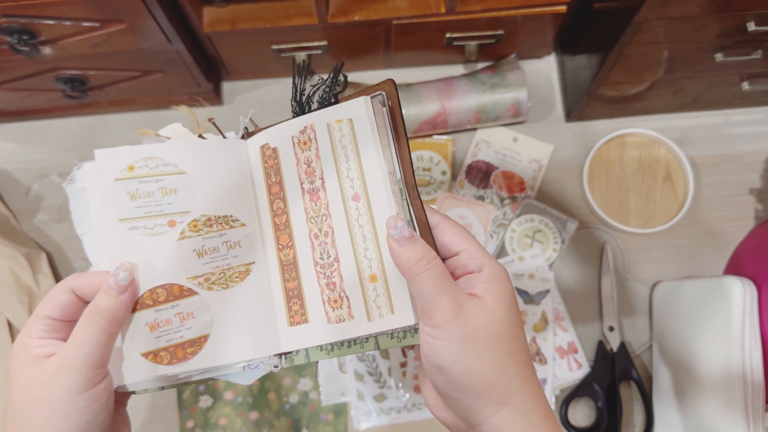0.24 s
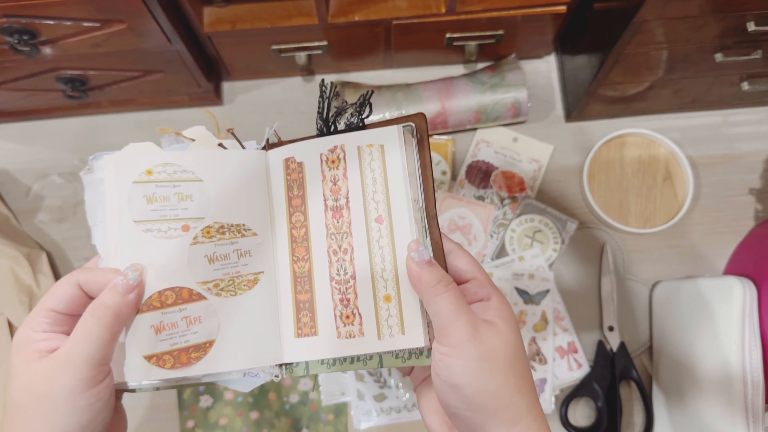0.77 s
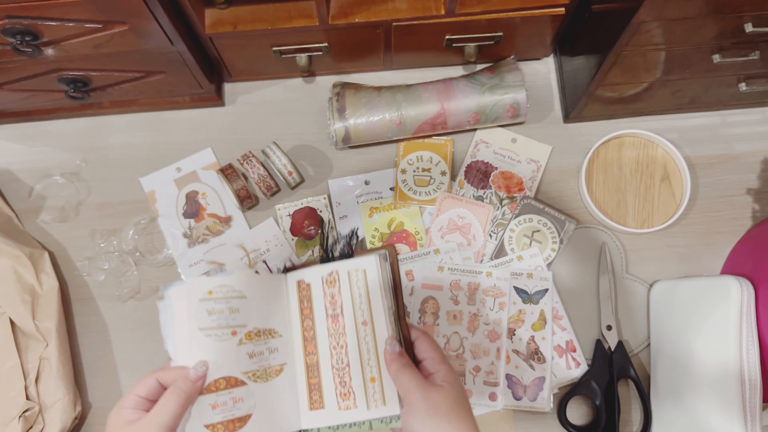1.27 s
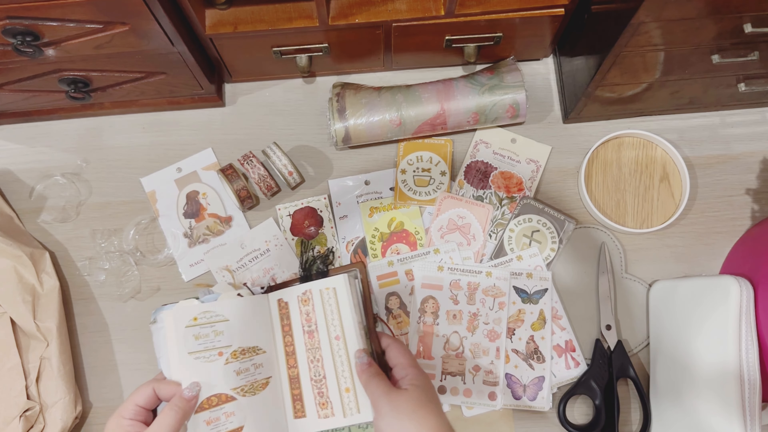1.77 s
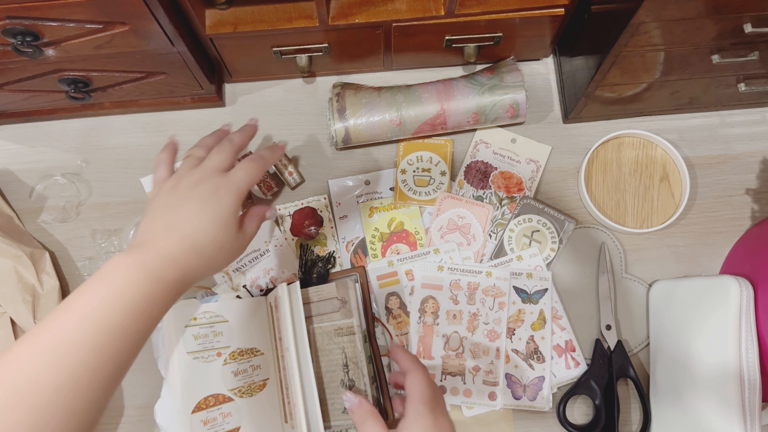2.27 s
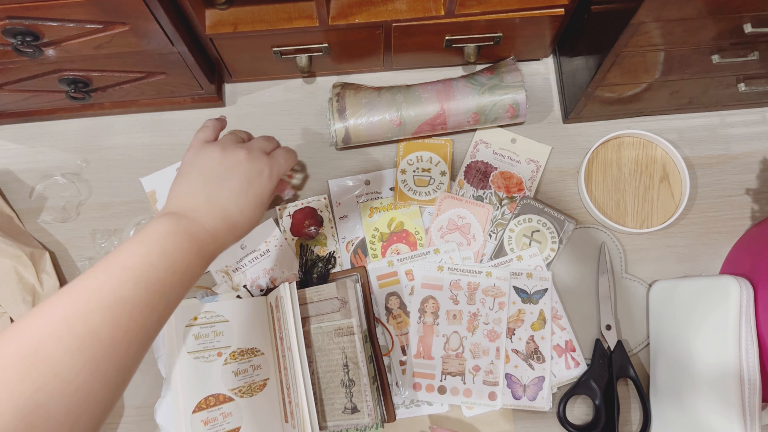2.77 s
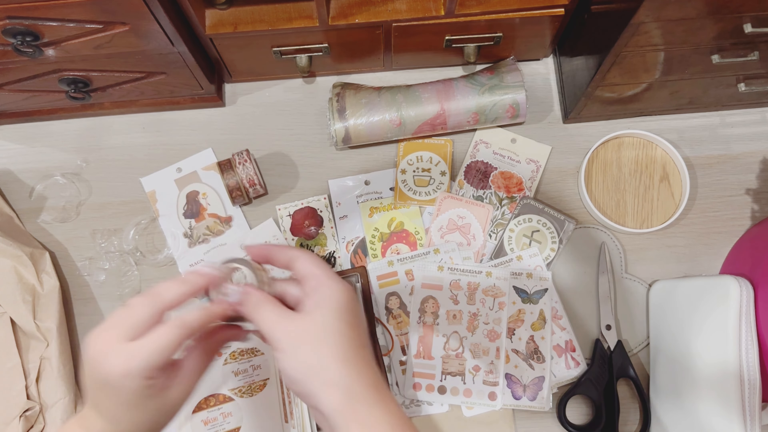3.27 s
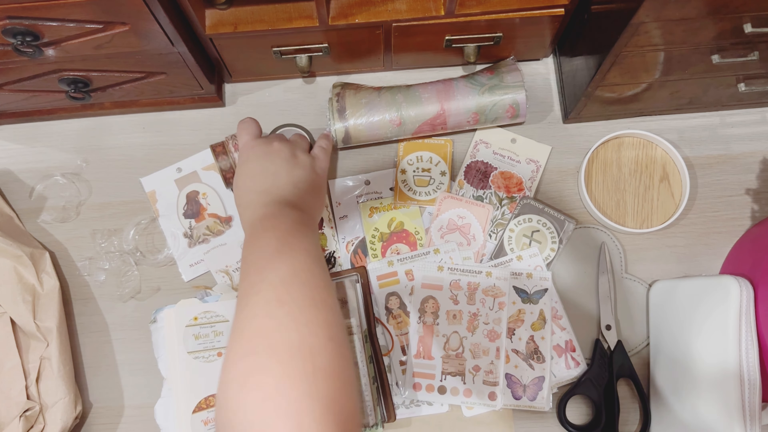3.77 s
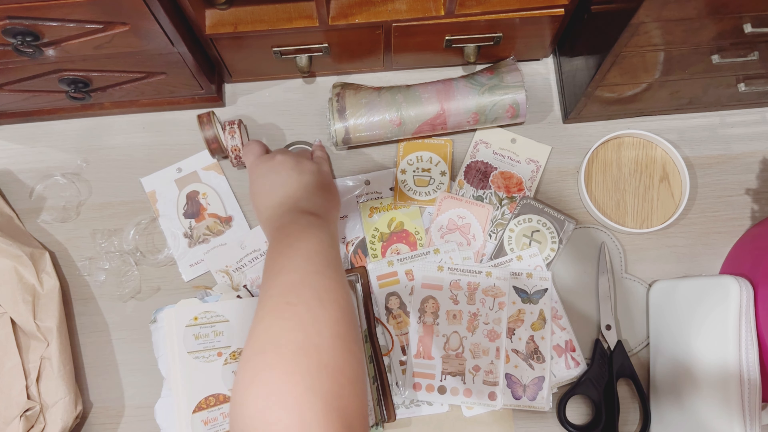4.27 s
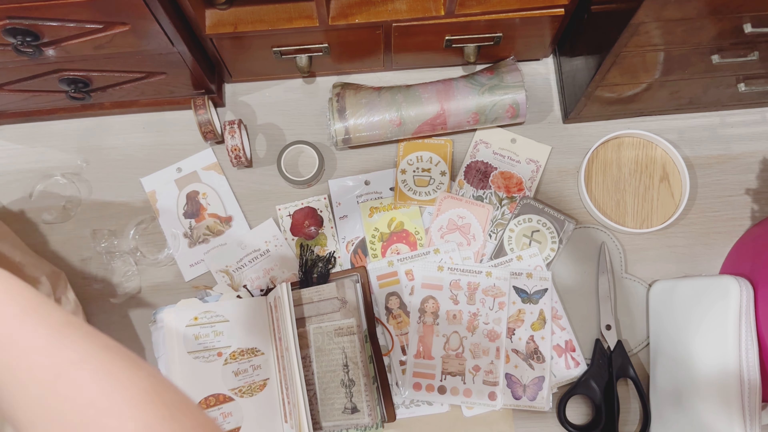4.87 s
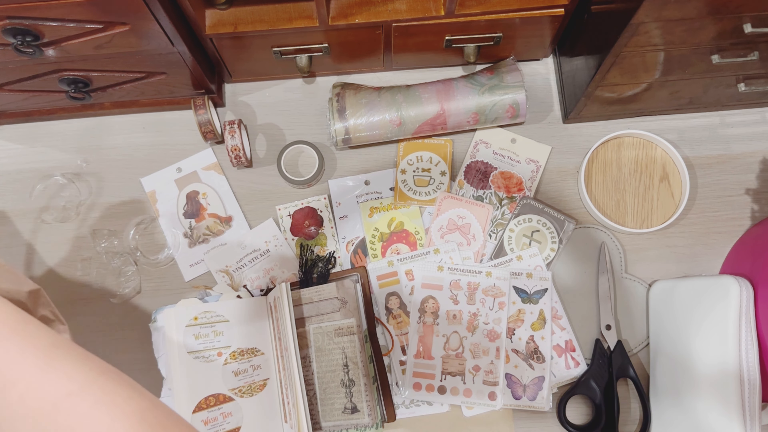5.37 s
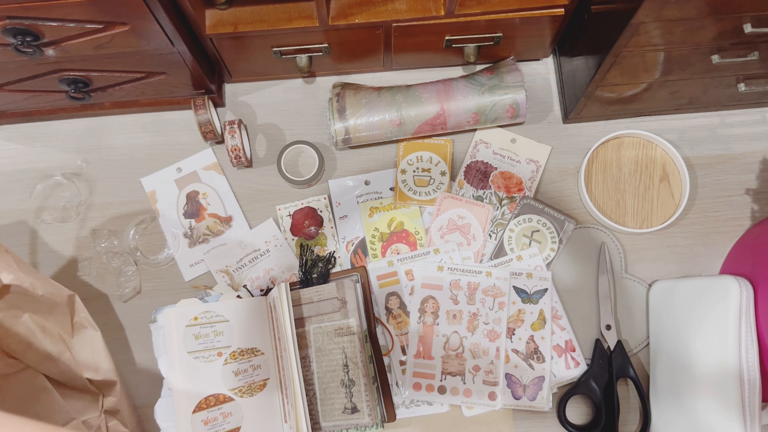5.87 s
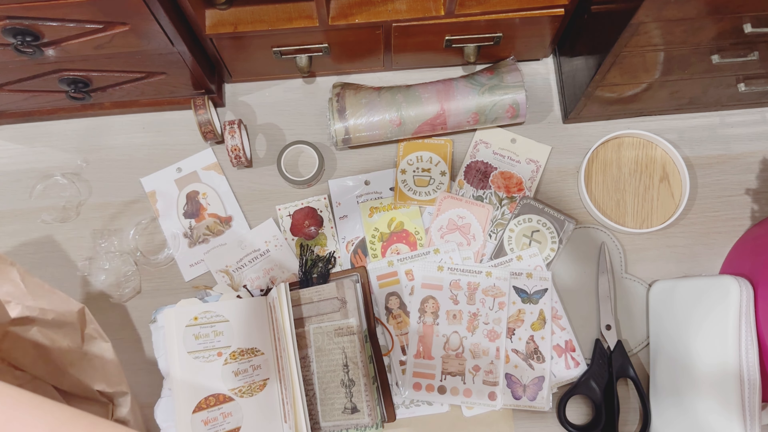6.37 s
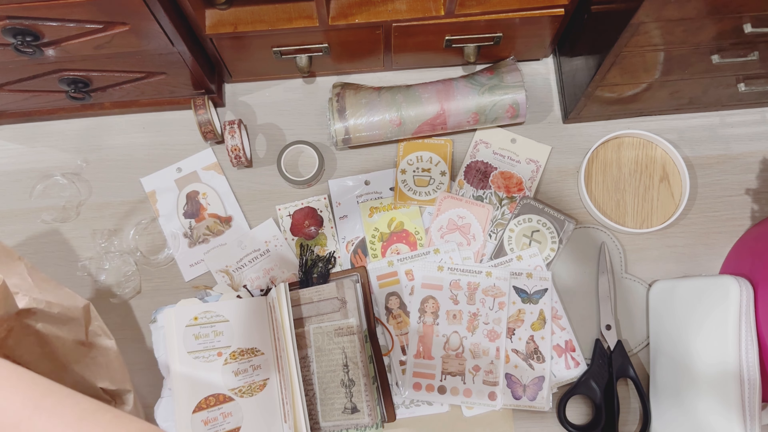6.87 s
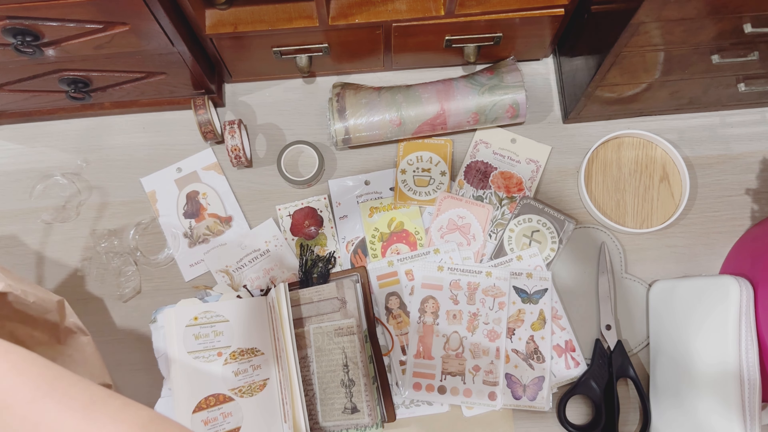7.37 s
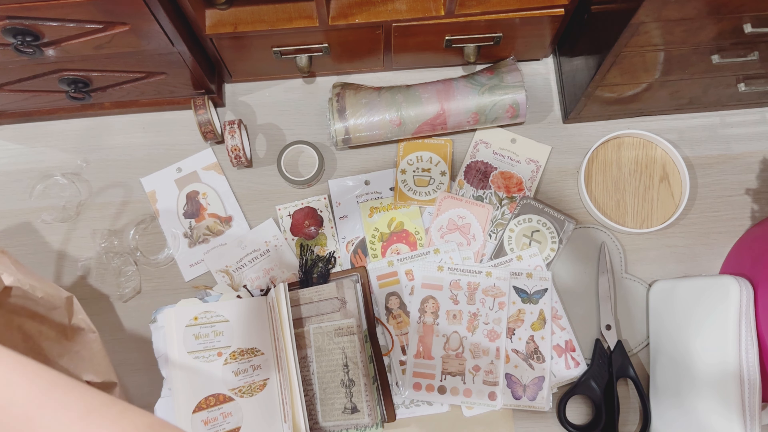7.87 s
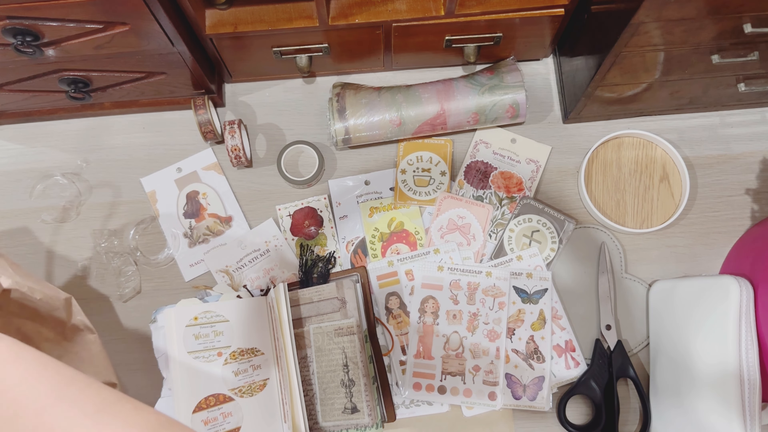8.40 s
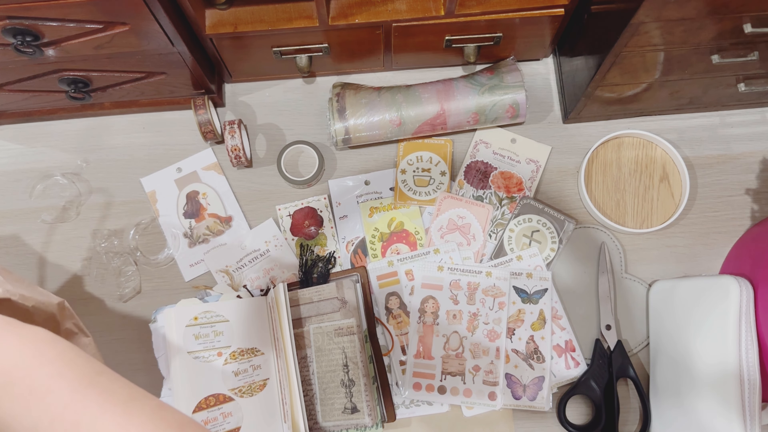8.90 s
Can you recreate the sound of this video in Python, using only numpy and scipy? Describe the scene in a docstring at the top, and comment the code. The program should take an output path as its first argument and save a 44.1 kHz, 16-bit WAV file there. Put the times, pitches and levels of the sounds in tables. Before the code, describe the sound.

Close stereo pickup of hands at a wooden table in a small, quiet room. Light page snaps and a brief high metallic jingle come first, then soft bumps from a notebook and faint taps of tape rolls. A hard cluster of knocks stands out far above everything, settling in a quick rattle. Afterward a paper bag crackles and rustles irregularly, with brushing swishes near the end, over a steady low hum.

```python
"""Paper snaps and rustle open over a low hum and faint hiss, joined at once by a small metal charm.
Hands lay down a notebook, set tape rolls on a wooden table and rummage in a paper bag, in a quiet room.
Knocks and snaps are dying noise bursts, with ringing table modes under the knocks; the charm is sines.
Rustle is patchy noise driven by strokes; hum and hiss are shaped noise with slowly wandering levels."""
import sys
import numpy as np
from scipy import signal
from scipy.fft import rfft, irfft, next_fast_len
from scipy.io import wavfile
from scipy.ndimage import uniform_filter1d

SR = 44100
rng = np.random.default_rng(int(sys.argv[2]) if len(sys.argv) > 2 else 0)


def store_pcm(level_fs):
    """Save levels as 16-bit WAV."""
    pcm = np.round(np.clip(level_fs, -1, 1) * 32767).astype(np.int16)
    wavfile.write(sys.argv[1], SR, np.atleast_2d(pcm).T)


N = 403074  # samples

# Tape rolls and notebook on the table: start_s, lower_ring_peak_db, lower_ring_hz, upper_ring_db,
# treble_db, table_top_db, deep_thud_db, hardness_db_per_octave
KNOCKS = [(1.513, -57, 1210, -64, -72, -56, -34, -4), (1.826, -47, 1030, -40, -58, -48.5, -33.5, 1.5),
          (2.546, -37, 1740, -41, -56, -35.5, -54, -4), (2.5676, -39, 1020, -48, -73, -36, -39, -4),
          (2.8, -42, 1210, -53, -79, -33.5, -52, -4), (2.8218, -58, 1450, -66, -77, -41, -52, -12),
          (3.96, -43.5, 1150, -68.5, -67, -40.5, -55, 0), (4.2037, -15.5, 1130, -35, -55, -27, -37, 6.5),
          (4.226, -17, 785, -21.5, -30, -40, -28.5, 4), (4.229, -9, 1180, -15.5, -23, -30, -45, 2),
          (4.235, -18.5, 1040, -43, -49, -38, -28.5, 1.5), (4.267, -22.5, 1090, -51, -59, -28, -41, 1.5),
          (4.284, -25.5, 800, -50, -61, -30, -46, 4), (4.49, -41, 830, -49, -57, -37.5, -54, 3),
          (4.51, -50, 810, -54, -59, -40, -58, -3)]
# Table top modes: pitch_hz, level_db, t60_s
TABLE_TOP = [(215, -6, 0.068), (280.7, -2.5, 0.16), (342, -9.5, 0.11), (419, -12.5, 0.084),
             (518, -7, 0.041), (704, -13.5, 0.027)]
# Table legs and floor modes: pitch_hz, level_db, t60_s
THUD = [(68, 0, 0.14), (113, -2, 0.11)]
KNOCK_UPPER_HZ, KNOCK_T60_S, KNOCK_ROOM_DB, KNOCK_PAN_DB = 2564, 0.02, -9.5, -0.5
KNOCK_BODY_DB, KNOCK_BODY_T60_S = -8., 0.14  # dull wooden body, against table top plus hardness

# The dropped rolls settle: start_s, level_db, t60_s
RATTLE = (4.235, -40, 0.5)
# Colour of the settling rolls: frequency_hz, level_db
ROLLS = [(400, -6), (1000, 2), (1600, -2), (2500, -2), (3500, -2), (4500, -21), (16000, -39)]
TICKS_PER_S = 400

# Paper and plastic snaps: start_s, lower_ring_peak_db, lower_ring_hz, upper_ring_hz, upper_ring_db,
# treble_db, hollow_puff_db
SNAPS = [(.062, -38.5, 1210, 3070, -61, -40, -50), (.084, -44, 1410, 2820, -47, -48, -63),
         (0.58, -48, 1600, 3530, -39.5, -50, -67), (1.114, -38, 1500, 2660, -51, -48, -69),
         (1.121, -39, 1390, 2630, -43, -44, -72), (1.169, -38.5, 1590, 2000, -55, -44, -61),
         (1.174, -42, 1100, 2620, -45, -37.5, -63), (1.194, -42, 1560, 2700, -59, -45, -56),
         (1.488, -45, 1050, 2310, -40, -66, -69), (1.494, -48, 641, 3480, -62, -56, -53),
         (1.653, -50, 1140, 2330, -55, -73, -71), (1.817, -43, 996, 2300, -56, -64, -61.5),
         (4.416, -32, 1350, 2600, -47, -58.5, -59), (4.452, -34, 1530, 3970, -32.5, -55, -45),
         (4.458, -29.5, 650, 2350, -36, -53, -52), (4.463, -33, 1320, 4100, -35, -35.5, -59),
         (4.474, -32, 1160, 2560, -31, -38, -37), (4.604, -36.5, 1090, 2820, -57, -75, -40),
         (4.655, -39, 740, 2010, -47, -70, -49), (4.881, -47.5, 810, 4100, -54, -71, -51),
         (4.909, -32, 1260, 2360, -42, -60, -46), (4.923, -37, 670, 2800, -33, -40, -56),
         (4.956, -30.5, 660, 3430, -24, -35, -45), (4.997, -49, 651, 2340, -59, -61, -39.5),
         (5.049, -43.5, 886, 3000, -59, -55, -42.5), (5.084, -40, 830, 2750, -61, -62, -50),
         (5.45, -42, 720, 2760, -65, -62, -50), (5.484, -38.5, 584, 3500, -69, -64, -40.5),
         (5.61, -40, 1040, 2540, -39.5, -60, -46.5), (5.935, -57, 1230, 2690, -50, -51, -56),
         (5.957, -46.5, 1330, 3780, -47, -46, -44.5), (5.985, -55, 900, 2600, -47, -68, -58),
         (6.04, -47, 799, 3580, -69, -67, -55), (6.168, -40.5, 1070, 2580, -35, -61, -60),
         (6.329, -43.5, 1000, 2430, -59, -72, -66), (6.559, -33, 754, 2710, -33.5, -40, -44),
         (6.629, -40.5, 710, 2620, -39.5, -46, -63), (6.93, -38, 1350, 2600, -44, -70, -48),
         (6.934, -30.5, 668, 2520, -52, -72, -49), (7.076, -38.5, 774, 2700, -41, -62, -64),
         (7.215, -40.5, 1160, 2460, -53, -63, -51), (7.252, -36.5, 1200, 2770, -29, -61, -47),
         (7.427, -34.5, 820, 2530, -32.5, -28.5, -42), (7.646, -44, 641, 2290, -55, -56, -52),
         (8.472, -62, 1240, 2730, -57, -43, -66), (8.807, -46, 985, 2800, -40.5, -39, -49),
         (8.903, -56, 1040, 2680, -41.5, -64, -62), (9.123, -33.5, 1200, 2470, -34.5, -63, -40)]
SNAP_T60_S, SNAP_ROOM_DB, SNAP_PAN_DB = 0.023, -10, -2.5

# Strokes of paper and sleeve: start_s, hold_s, treble_level_db, middle_lift_db
STROKES = [(0.075, .01, -63, -0.5), (1.16, .1, -68, -5), (1.495, .01, -73, -1), (1.86, .02, -60.5, -3.5),
           (4.344, 0.048, -63, 4.5), (4.476, 0.011, -54.5, -1.5), (4.683, .01, -68, 1),
           (4.948, 0.039, -61, 0), (5.04, .01, -56, -4), (5.214, .005, -53.5, -4), (5.316, 0.12, -61, 0),
           (5.46, 0.061, -59, -1), (5.588, .005, -63, 2), (6.076, .005, -64, -2), (6.184, .01, -64, 2.5),
           (6.565, .01, -61.5, -4), (6.926, .02, -69, 4), (7.22, 0.044, -68, -9), (7.353, .005, -52.5, -8),
           (7.427, .005, -61, -2), (7.548, .03, -68, -13), (8.197, .01, -54.5, -11.5),
           (8.343, 0.027, -53, -11.5), (8.498, 0.071, -53.5, -9.5), (8.61, .05, -58, -7),
           (8.768, 0.042, -51, -6.5), (9.07, .005, -59, -6)]
RISE_DB_PER_S, FALL_DB_PER_S = 258, 153
STROKE_BODY_DB = -1.2  # on top of the middle lift
# Faint shifting of paper and sleeve between the strokes: time_s, treble_level_db
SHIFTING = [(0, -72.5), (.4, -76), (.65, -76.5), (.95, -73), (1.4, -72.5), (1.8, -77), (2.0, -73),
            (2.56, -76.5), (3.17, -74.5), (4.18, -77), (4.3, -68.5), (4.8, -72.5), (5.7, -74.5), (6.0, -71),
            (6.7, -74.5), (7.1, -73.5), (7.8, -72.5), (9.14, -70.5)]
SHIFTING_MIDDLE_DB, SHIFTING_BODY_DB = 3.5, 6.5  # lifts over the treble level
# Colour of rubbed paper: frequency_hz, level_db
PAPER = [(200, 7.5), (500, 0), (1200, 4), (1900, -4), (2600, -0.5), (4000, -1.5), (5500, -9), (8000, -7.5),
         (11000, -11), (15500, -13)]

# Charm strikes: start_s, level_db, tilt_db_per_octave (toward the upper modes)
JINGLE = [(.187, -55, -29), (1.122, -50, 14), (1.132, -40, -4), (1.148, -35.5, -24), (1.175, -60, 25.5),
          (1.202, -58, 6)]
# Charm modes: pitch_hz, level_db, t60_s, rise_s
CHARM = [(6690, 0.1, 0.11, 0.0062), (11200, 0, 0.097, 0.0031), (11700, -10, 0.054, .002),
         (13400, 1, 0.028, 0.00092), (13500, -1, .035, .001)]

# Decay of the room echoes: frequency_hz, t60_s
ROOM = [(200, 0.38), (1000, 0.38), (3000, 0.24), (8000, 0.24), (15000, 0.15)]

# Colour of the low hum: frequency_hz, level_db
HUM = [(15, -63), (25, -49), (43, -11), (64, 0), (86, -2.5), (115, 0), (179, -14), (228, -22), (338, -20.5),
       (408, -19.5), (437, -24), (769, -26.5), (1500, -31.5), (1950, -37), (3300, -120)]
# Colour of the faint hiss: frequency_hz, level_db
HISS = [(300, -9.5), (700, -3.5), (1500, 0), (2500, -4), (4200, -4.5), (5300, -21), (6200, -8),
        (7300, -17.5), (8200, -10), (9500, -41), (12000, -79), (15500, -24)]
HUM_DB, HISS_DB = -52, -66.5  # centres of the wandering levels

# Stereo likeness of the left and right channels: frequency_hz, likeness_0_to_1
LIKENESS = [(60, .993), (130, .96), (250, .8), (500, .4), (900, .15), (1500, .4), (2000, .3), (3000, .65),
            (4500, .55), (5400, .2), (6500, .8), (8000, .9), (9500, 1), (10200, 1), (11000, .85),
            (12400, 1), (13800, .8), (14700, 1)]
# Stereo phase of the right channel against the left: frequency_hz, phase_rad
STEREO_PHASE = [(300, 0), (1500, 1.), (2400, .1), (3400, 1.), (4900, .7), (5600, -.8), (6800, .2),
                (8200, -.3), (9350, -3.14), (10150, -3.14), (11900, -6.28), (12800, -6.28), (14600, -9.42),
                (16000, -9.42)]
EDGE_HZ = 15800  # top of the sound


def knock(peak_db, hz, upper_db, treble_db, top_db, thud_db, hard_db, echoes):
    """A crack sets the table top and legs ringing; hard blows favour the upper modes."""
    t, sharp = crack(peak_db, hz, KNOCK_UPPER_HZ, upper_db, treble_db, KNOCK_T60_S)
    top_modes = []
    for mode_hz, mode_db, t60 in TABLE_TOP:
        octaves_up = max(np.log2(mode_hz / 280.), 0)
        top_modes.append((mode_hz, mode_db + top_db + hard_db * octaves_up, t60))
    # Neighbouring modes swing opposite ways.
    top = ringing(top_modes[::2], t) - ringing(top_modes[1::2], t)
    top = top * (1 - np.exp(-t / 0.0023))
    thud = gain_of(thud_db) * ringing(THUD, t) * (1 - np.exp(-t / 0.0094))
    body_colour = [(120, -17), (250, 1.5), (500, -6), (800, -16), (3000, -53)]
    body = burst(t, body_colour, top_db + hard_db + KNOCK_BODY_DB, KNOCK_BODY_T60_S)
    body = body * (1 - np.exp(-t / 0.0038))
    return placed(sharp + top + thud + body, KNOCK_ROOM_DB, KNOCK_PAN_DB, echoes)


def rattle():
    """Quick uneven ticks die away as the rolls come to rest."""
    start_s, db, t60 = RATTLE
    t = np.arange(SR // 2) / SR
    strength = gain_of(2.0 * np.minimum(rng.exponential(1, len(t)), 4))
    ticks = strength * (rng.random(len(t)) < TICKS_PER_S / SR)
    ticks = signal.lfilter([1], [1, -.98], ticks)  # each tick gets a short tail
    ticks = evened(coloured(ticks * rng.standard_normal((2, len(t))), ROLLS))
    return start_s, ticks * gain_of(db - 60 * t / t60) * (1 - np.exp(-t / 0.0046))


def snap(*row, echoes):
    """A crack with a short hollow puff from the folded paper."""
    *sharp_settings, puff_db = row
    t, sharp = crack(*sharp_settings, SNAP_T60_S)
    puff_colour = [(150, -31), (350, 6.5), (500, 5.5), (1000, -31), (4000, -58)]
    puff = burst(t, puff_colour, puff_db, 0.065) * (1 - np.exp(-t / 0.003))
    return placed(sharp + puff, SNAP_ROOM_DB, SNAP_PAN_DB, echoes)


def crack(peak_db, hz, upper_hz, upper_db, treble_db, t60):
    """A brief contact sounds two broad resonances and a bright tick."""
    t = np.arange(SR // 4) / SR
    lower_colour = [(hz / 2.66, -24), (hz / 0.95, -3), (hz, 0), (hz * 0.98, -3), (hz * 1.5, -17), (16000, -55)]
    lower = burst(t, lower_colour, peak_db, t60)
    lower *= gain_of(peak_db) / abs(lower).max(axis=1)[:, None]  # its level is a peak value
    upper_colour = [(upper_hz / 1.19, -20), (upper_hz, 0), (upper_hz * 1.38, -17), (16000, -35)]
    upper = burst(t, upper_colour, upper_db, 0.61 * t60)
    tick_colour = [(2000, -12), (5000, -1), (8500, 1.0), (11500, -8), (15000, -6)]
    tick = burst(t, tick_colour, treble_db, 0.016)
    return t, lower + upper + tick


def burst(t, points, db, t60):
    """A dying burst of coloured noise whose rms starts at db."""
    fall = gain_of(-60 * t / max(t60, .003)) * (1 - np.exp(-t / 0.00043))
    x = coloured(rng.standard_normal((2, len(t))), points) * fall
    return gain_of(db) * x * np.linalg.norm(fall) / np.linalg.norm(x, axis=1)[:, None]


def ringing(modes, t):
    """Solid parts ring as a sum of dying sines."""
    return sum(gain_of(db - 60 * t / t60) * np.sin(2 * np.pi * hz * t) for hz, db, t60 in modes)


def rustle():
    """Fibres rub as a patchy hiss whose force flickers, with tiny crackles in it."""
    treble_gain, middle_gain, body_gain = rubbing_force()
    strength = gain_of(2.7 * np.minimum(rng.exponential(1, N), 5))
    crackle = strength * (rng.random(N) < 300 / SR)  # about 300 a second
    crackle = signal.lfilter([1], [1, -.95], crackle)  # each crackle dies within a few ms
    force = gain_of(1.07 * wander(size=300)) + 0.28 * crackle
    z = signal.stft(force * rng.standard_normal((2, N)), nperseg=256)[2]
    # Creases favour changing bands.
    patches = uniform_filter1d(rng.standard_normal(z.shape[1:]), size=5, axis=0)
    patches = evened(uniform_filter1d(patches, size=8, axis=1))
    rub = signal.istft(z * gain_of(2.96 * patches), nperseg=256)[1][:, :N]
    rub = coloured(rub, PAPER)
    body = coloured(rub, [(1200, 3.5), (2400, -40)])
    treble = coloured(rub, [(3500, -27), (6000, 1)])
    middle = rub - body - treble
    rub = treble_gain * treble + middle_gain * middle + body_gain * body
    return rub / treble.std() * gain_of([[-1.2], [1.2]])  # the hands work right of centre


def rubbing_force():
    """Gains of treble, middle and body: faint shifting plus strokes that rise, hold and fall."""
    t = np.arange(N) / SR
    lift_db = np.array([[0], [SHIFTING_MIDDLE_DB], [SHIFTING_BODY_DB]])
    power = gain_of(np.interp(t, *np.transpose(SHIFTING)) + lift_db) ** 2
    for s, hold, db, middle_db in STROKES:
        near = slice(max(round((s - .3) * SR), 0), round((s + hold + .5) * SR))
        before_s = np.maximum(s - t[near], 0)
        after_s = np.maximum(t[near] - s - hold, 0)
        shape_db = -RISE_DB_PER_S * before_s - FALL_DB_PER_S * after_s
        lift_db = np.array([[0], [middle_db], [middle_db + STROKE_BODY_DB]])
        power[:, near] += gain_of(db + shape_db + lift_db) ** 2
    return np.sqrt(power)


def charm():
    """Each strike rings the high modes of a small metal pendant."""
    out, t = np.zeros((2, N)), np.arange(SR // 3) / SR
    for s, db, tilt_db in JINGLE:
        ring = np.zeros((2, len(t)))
        for hz, mode_db, t60, rise in CHARM:
            phase = 2 * np.pi * rng.random((2, 1))
            level_db = db + mode_db + tilt_db * np.log2(hz / CHARM[0][0])
            envelope = gain_of(level_db - 60 * t / t60) * (1 - np.exp(-t / rise))
            ring += envelope * np.sin(2 * np.pi * hz * t + phase)
        add(out, s, ring)
    return out


def room():
    """Sparse echoes of random sign, each band dying at its own speed."""
    taps = rng.choice([-1., 1.], (2, SR // 2)) * (rng.random((2, SR // 2)) < .06)
    taps[:, :100] = 0  # a short gap ahead of the first echo
    hz, t, z = signal.stft(taps, SR, nperseg=256)
    fall = gain_of(-60 * t / read(ROOM, hz)[:, None])
    tail = signal.istft(z * fall, SR, nperseg=256)[1]
    return tail / np.linalg.norm(tail[0])


def placed(dry, wet_db, pan_db, echoes):
    """Adds the room's answer and sets the side; negative pan favours the right."""
    wet = gain_of(wet_db) * signal.fftconvolve(dry, echoes, axes=1)
    wet[:, :dry.shape[1]] += dry
    return wet * gain_of([[pan_db / 2], [-pan_db / 2]])


def room_tone():
    """A lumpy low hum and a steadier hiss, both shaped from noise."""
    hum = evened(coloured(rng.standard_normal((2, N)), HUM))
    hum = hum * gain_of(HUM_DB + 2.4 * wander(size=4000))
    hiss = evened(coloured(rng.standard_normal((2, N)), HISS))
    hiss = hiss * gain_of(HISS_DB + 1.3 * wander(size=1500))
    return hum + hiss


def wander(size):
    """Slow chance of rms 1, smoothed twice over size samples."""
    return evened(uniform_filter1d(uniform_filter1d(rng.standard_normal(N), size), size))


def coloured(x, points):
    """Shapes the spectrum of x by the curve of the points."""
    gain = gain_of(read(points, np.fft.rfftfreq(x.shape[-1], 1 / SR)))
    return irfft(rfft(x) * gain, x.shape[-1])


def read(points, hz):
    """Reads a curve on a log-frequency axis."""
    f, value = np.transpose(points)
    return np.interp(np.log(hz + 1), np.log(f + 1), value)


def gain_of(db):
    """dB to gain."""
    return 10 ** (np.asarray(db) / 20)


def evened(x):
    """Scales to rms 1."""
    return x / np.sqrt(np.mean(x ** 2) + 1e-20)


def add(mix, s, sound):
    """Mixes a stereo sound in at time s."""
    part = mix[:, round(s * SR):][:, :sound.shape[1]]
    part += sound[:, :part.shape[1]]


def scene():
    """Layers every source; each channel gets its own noise and charm phases."""
    echoes = room()
    mix = room_tone() + rustle() + placed(charm(), -9.0, 0., echoes)[:, :N]
    add(mix, *rattle())
    for s, *row in KNOCKS:
        add(mix, s, knock(*row, echoes=echoes))
    for s, *row in SNAPS:
        add(mix, s, snap(*row, echoes=echoes))
    return mix


def record(dry):
    """The right channel blends the phase-turned left with its own sound; then the band limit."""
    size = next_fast_len(N + SR)
    hz = np.fft.rfftfreq(size, 1 / SR)
    left, own = rfft(dry, size)
    likeness = np.clip(read(LIKENESS, hz), 0, 1)
    shared = likeness * left * gain_of(0.48) * np.exp(1j * read(STEREO_PHASE, hz))
    right = shared + np.sqrt(1 - likeness ** 2) * own
    pair = irfft(np.array([left, right]), size)[:, :N]
    low_pass = signal.firwin(511, EDGE_HZ, window=("kaiser", 9), fs=SR)
    return signal.oaconvolve(pair, low_pass[None], "same")


dry = scene()
out = record(dry)
store_pcm(out)
```